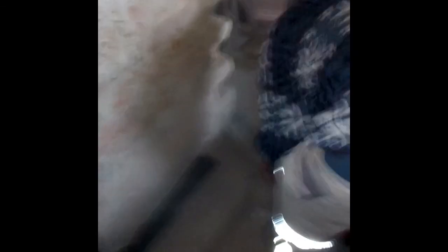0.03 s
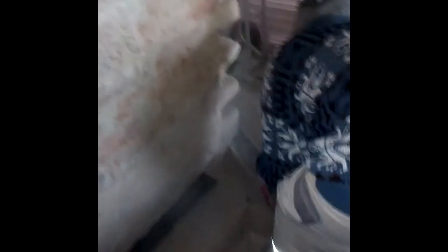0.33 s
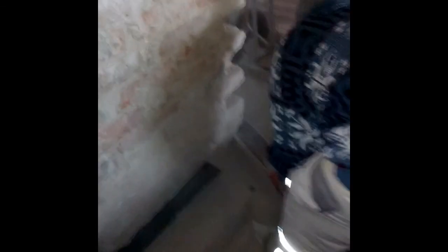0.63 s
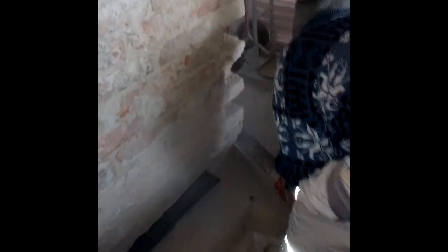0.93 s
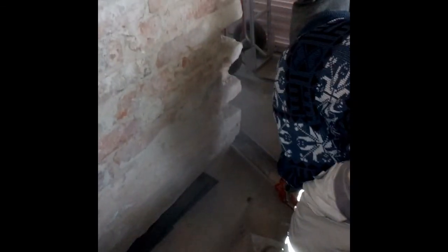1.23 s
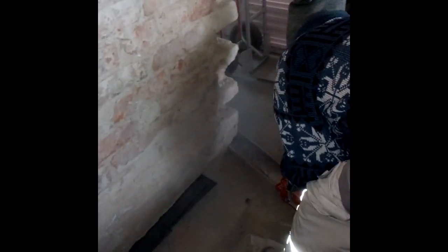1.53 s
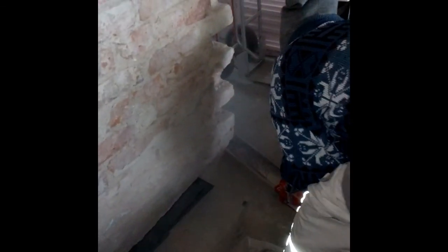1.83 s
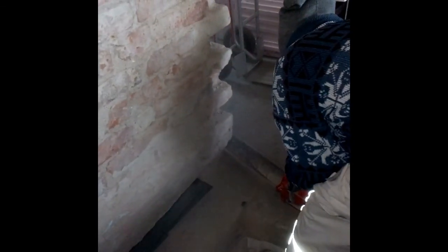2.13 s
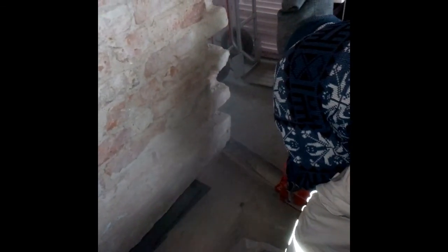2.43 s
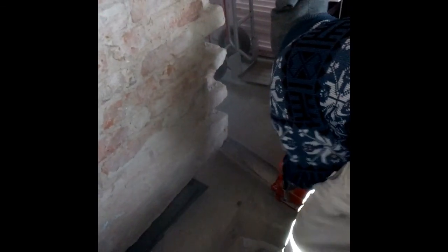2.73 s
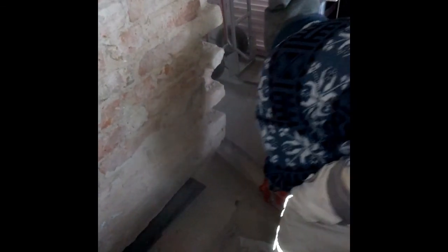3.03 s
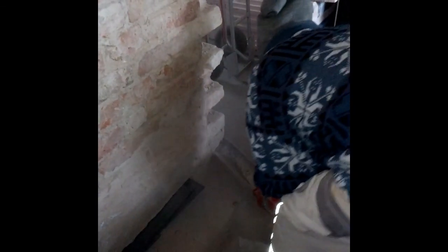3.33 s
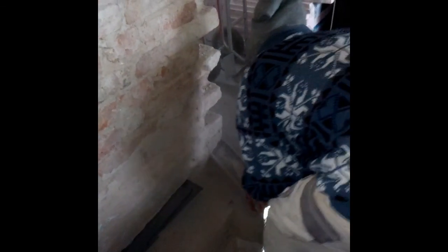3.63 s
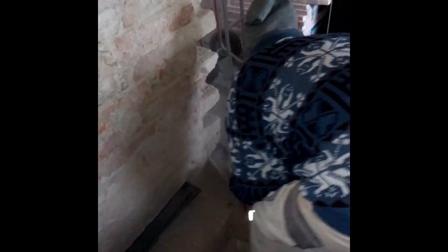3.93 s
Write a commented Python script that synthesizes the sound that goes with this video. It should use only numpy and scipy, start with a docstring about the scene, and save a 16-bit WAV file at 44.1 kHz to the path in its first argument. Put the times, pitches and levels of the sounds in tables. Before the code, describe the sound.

A power saw roars steadily against a brick wall near the microphone, grit scraping and ringing on the blade over a humming, thinly whining motor. Halfway through, the pitch drops a little while the roar carries on.

```python
"""A hand-held masonry saw runs flat out at a brick wall. From the start its motor hums, its fan whines thinly
and the geared-down blade drones below, while rushing air and grit on the blade make a loud roar that rings in
the blade and housing, with low ringing tones near 1 kHz. Around 1.5 s the motor peaks and a fine hiss has crept
in. From 2 s the pitch sags a little under load; towards 4 s the hiss fades while the roar carries on."""
import sys
import numpy as np
from scipy import signal
from scipy.fft import rfft, irfft
from scipy.io import wavfile
from scipy.ndimage import uniform_filter1d, minimum_filter1d

SR = 44100
rng = np.random.default_rng(int(sys.argv[2]) if len(sys.argv) > 2 else 0)


def output_pcm(signal):
    """Save a mono or channel-first signal as 16-bit PCM at the path in sys.argv[1].

    Samples are clipped to [-1, 1] before scaling.
    """
    pcm = np.clip(np.atleast_2d(signal).T, -1, 1) * 32767
    wavfile.write(sys.argv[1], SR, np.round(pcm).astype(np.int16))


N = 176400  # 4 s


def from_db(db):
    """Decibels to gain."""
    return 10 ** (np.asarray(db) / 20)


def unit_power(x):
    """Scale to an RMS of 1."""
    return x / np.sqrt(np.mean(x ** 2) + 1e-20)


def envelope(points):
    """Straight ramps between breakpoints, at every sample."""
    return np.interp(np.arange(N) / SR, *np.transpose(points))


def drift(rate_hz):
    """Random modulator of spread 1, moving mostly slower than rate_hz."""
    hz = np.arange(N // 2 + 1) * SR / N
    return unit_power(irfft(rfft(rng.standard_normal(N)) / (1 + (hz / rate_hz) ** 2), N))


def equalise(x, curve):
    """Shape a sound with a smooth EQ curve; unit power."""
    hz, db = np.transpose(curve)
    bins = np.maximum(np.arange(N // 2 + 1) * SR / N, 1)
    gain = from_db(np.interp(np.log(bins), np.log(hz), db))
    return unit_power(irfft(rfft(x) * gain, N))


def resonate(x, hz, width_hz):
    """A steep-sided resonance from two band-passes in series; unit power."""
    r = np.exp(-np.pi * width_hz * np.sqrt(2) / SR)
    section = [1 - r, 0, r - 1, 1, -2 * r * np.cos(2 * np.pi * hz / SR), r * r]
    return unit_power(signal.sosfilt([section, section], x))


def grit(ticks_per_s=6000, spread_db=2.5, tick_share=.39, patchy_db=.5):
    """Dense ticks of grit mixed into turbulent air."""
    sizes = from_db(spread_db * np.minimum(rng.exponential(1, N), 4)) * rng.choice([-1, 1], N)
    ticks = unit_power(sizes * (rng.random(N) < ticks_per_s / SR))
    air = rng.standard_normal(N)
    return (np.sqrt(tick_share) * ticks + np.sqrt(1 - tick_share) * air) * from_db(patchy_db * drift(22))


def ringing(modes):
    """Grit and air keep a set of resonances sounding."""
    return sum(from_db(db) * resonate(grit(), hz, width) for hz, width, db in modes)


def tone(cycles, db, flutter_db=1.3):
    """One fluttering sine locked to a shaft."""
    return np.sqrt(2) * from_db(db + flutter_db * drift(10)) * np.sin(2 * np.pi * (cycles + rng.random()))


# Fader ride of the blade's drone: t/s, level/dB
DRONE_FADER = [(0, -44), (.15, -39), (.32, -35), (.48, -55), (.75, -39), (1.05, -34.5), (1.75, -35),
               (1.95, -41.5), (2.25, -41.5), (2.45, -33.5), (2.68, -40), (2.9, -36), (3.2, -35.5),
               (4, -35.5)]
def blade_drone(blade_turns):
    """The blade drones low, at two cycles a turn."""
    return tone(2 * blade_turns, envelope(DRONE_FADER))


# Fader rides of the motor hum, the fan whine and their octaves: t/s, level/dB
HUM_FADER = [(0, -34.5), (.2, -35), (1.0, -33), (1.7, -31.5), (1.95, -36.5), (2.3, -30), (3.05, -29),
             (3.45, -31), (3.65, -33), (4, -35.5)]
HUM_OCTAVE_FADER = [(0, -27), (.42, -28.5), (.6, -34), (1.0, -34.5), (1.6, -38), (2.5, -32.5), (3.0, -36),
                    (3.5, -29.5), (3.8, -28), (4, -30)]
WHINE_FADER = [(0, -17.5), (.1, -17), (.36, -25), (.68, -17), (1.05, -26.5), (1.4, -34), (1.56, -27.5),
               (1.8, -23), (2.0, -22), (2.3, -24), (2.5, -26), (2.78, -23.5), (3.05, -21.5), (3.28, -31),
               (3.55, -19), (3.8, -23), (4, -31)]
WHINE_OCTAVE_FADER = [(0, -38), (.9, -36), (1.3, -38), (1.8, -37), (2.0, -31), (2.75, -32), (3.0, -38),
                      (3.3, -34), (3.6, -37), (4, -39)]
# Weaker motor partials: multiple of the shaft rate, level/dB
MOTOR_PARTIALS = [(3, -38), (5, -39), (7, -41), (9, -32.5), (18, -59)]
def motor(turns, fan_blades=6, whine_flutter_db=1.5):
    """The motor hums at the shaft rate; its fan whines at the rate the fan blades pass."""
    hum = tone(turns, envelope(HUM_FADER)) + tone(2 * turns, envelope(HUM_OCTAVE_FADER))
    passes = fan_blades * turns
    whine = tone(passes, envelope(WHINE_FADER)) + tone(2 * passes, envelope(WHINE_OCTAVE_FADER))
    overtones = sum(tone(k * turns, db, flutter_db=3) for k, db in MOTOR_PARTIALS)
    return hum + from_db(whine_flutter_db * drift(45)) * whine + overtones


# EQ of the dust's sizzle: f/Hz, relative level/dB
SIZZLE_EQ = [(9000, -50), (13900, -24), (14300, -4), (14750, 0), (15500, 0), (16000, -7)]
def dust_sizzle(start_db=-38, rise_db_per_s=.4, flicker_db=.9):
    """Dust sizzles at the very top, creeping up in level."""
    level_db = start_db + rise_db_per_s * np.arange(N) / SR + flicker_db * drift(25)
    return from_db(level_db) * equalise(grit(), SIZZLE_EQ)


# Fader ride of the scrape's fine hiss: t/s, level/dB
HISS_FADER = [(0, -52), (.8, -52), (1.35, -40), (2.0, -39), (2.5, -40), (2.9, -40), (3.4, -45), (4, -52)]
# EQ of that hiss: f/Hz, relative level/dB
HISS_EQ = [(4000, -40), (6500, -6), (7200, 4), (7650, -2), (8100, -15), (10000, -24), (16000, -40)]
def fine_hiss():
    """A thin band of grit noise near 7 kHz swells and fades above the scrape."""
    return from_db(envelope(HISS_FADER)) * equalise(grit(), HISS_EQ)


# Fader rides of the low ringing tones, the housing and the blade: t/s, level/dB
LOW_RING_FADER = [(0, -29), (.25, -25.5), (.7, -25), (.9, -29), (1.04, -23), (1.35, -24.5), (1.75, -22),
                  (2.12, -30.5), (2.35, -25), (2.68, -32), (2.87, -19.5), (3.2, -22.5), (3.43, -23.5),
                  (3.7, -23), (3.86, -19), (4, -24.5)]
HOUSING_FADER = [(0, -24), (.2, -18), (.42, -20.5), (.57, -16.5), (.9, -23), (1.16, -14), (1.3, -22),
                 (1.42, -15.5), (1.57, -17.5), (1.74, -15), (2.1, -17.5), (2.3, -15), (2.6, -16),
                 (2.85, -17), (2.98, -16.5), (3.5, -18), (3.9, -17), (4, -18)]
BLADE_FADER = [(0, -25), (.6, -15.5), (1.25, -21), (1.6, -15), (1.95, -12), (2.25, -14.5), (2.42, -13),
               (2.6, -16), (3.0, -14.5), (3.4, -23), (4, -14)]
# Resonances of the same layers: f/Hz, width/Hz, relative level/dB
LOW_RING = [(959.8, 31.4, -6), (1011, 31, -10), (1224, 53, -12), (885, 17, -21)]
HOUSING_RING = [(2242, 41, -9), (2323, 68, -8), (2392, 55, -21)]
BLADE_RING = [(4276, 103, -9.5), (4106, 85, -15.5)]
def ringing_parts(burst_db=1.5, burst_hz=22):
    """Air and grit ring the saw in bursts: low tones near 1 kHz, housing in the middle, blade high."""
    parts = [(LOW_RING_FADER, LOW_RING), (HOUSING_FADER, HOUSING_RING), (BLADE_FADER, BLADE_RING)]
    return sum(from_db(envelope(fader) + burst_db * drift(burst_hz)) * ringing(modes)
               for fader, modes in parts)


# Fader ride of the scrape: t/s, level/dB
SCRAPE_FADER = [(0, -18), (.3, -17.3), (.43, -18), (.65, -16.5), (.88, -19.5), (1.04, -16), (1.25, -18),
                (1.6, -17), (1.85, -15.5), (2.12, -18), (2.43, -17.5), (2.62, -19.5), (2.8, -17),
                (3.0, -18), (3.3, -18), (3.5, -18.5), (3.7, -19), (4, -18.5)]
# EQ of the scrape: f/Hz, relative level/dB
SCRAPE_EQ = [(1500, -33), (3200, -7.5), (3550, -3.5), (3950, 2.5), (4300, 2), (4550, -1), (4800, 2),
             (5100, 1.5), (5280, -3), (5600, -2), (6300, -4.5), (6800, -10.5), (7400, -21), (8000, -29),
             (9400, -29.5), (10500, -33), (13800, -32), (16000, -33)]
# Resonances of the scrape: f/Hz, width/Hz, relative level/dB
SCRAPE_RING = [(4796, 87, -15), (5057, 130, -15.5), (6010, 70, -25)]
def scrape(trim_db=-1.06):
    """Grit scrapes on the blade: the roar's bright edge, around 4-6 kHz."""
    noise = from_db(trim_db) * equalise(grit(), SCRAPE_EQ)
    return from_db(envelope(SCRAPE_FADER)) * (noise + ringing(SCRAPE_RING))


# Fader ride of the rush: t/s, level/dB
RUSH_FADER = [(0, -17.5), (.2, -18), (.42, -17.5), (.6, -18), (.9, -19), (1.08, -18), (1.3, -19.5),
              (1.42, -17), (1.6, -18), (1.85, -17.5), (2.1, -19), (2.3, -17.5), (2.6, -18.5), (2.88, -17.5),
              (3.15, -17.5), (3.3, -18), (3.45, -18), (4, -17.5)]
# EQ of the rush: f/Hz, relative level/dB
RUSH_EQ = [(20, -25), (70, -39.5), (130, -27.5), (240, -19.5), (380, -13), (460, -17.5), (560, -9),
           (680, -9.5), (820, -4.5), (1200, -4), (1450, -3.5), (1800, -5), (1970, 1), (2600, -0.5),
           (3000, -2.5), (3300, -0.5), (3550, -16), (5000, -19), (16000, -57)]
# Resonances of the rush: f/Hz, width/Hz, relative level/dB
RUSH_RING = [(801, 24, -22.5), (1588, 60, -16), (1780, 25, -23.5), (1964, 63, -15.5), (2806, 120, -19),
             (3160, 58, -19)]
def rush(trim_db=-.5):
    """Air and grit rush over the blade: the roar's midrange body."""
    noise = from_db(trim_db) * equalise(grit(), RUSH_EQ)
    return from_db(envelope(RUSH_FADER)) * (noise + ringing(RUSH_RING))


# Brief ducks in the roar: t/s, depth/dB
ROAR_DIPS = [(.345, 1), (1.5, 3), (1.71, 2), (1.87, 2.5), (1.965, 3.5), (2.495, 0.5), (2.84, 4),
             (2.925, 2.5), (3.265, 3)]
def blade_roar(blade_turns, dip_width_s=.0096, chatter_db=.49, rub_depth=.032):
    """All the air and grit layers dip and chatter together, pulsing lightly once a blade turn."""
    layers = rush() + scrape() + ringing_parts() + fine_hiss() + dust_sizzle()
    t = np.arange(N) / SR
    dip_db = sum(depth * np.exp(-.5 * ((t - at) / dip_width_s) ** 2) for at, depth in ROAR_DIPS)
    chatter = from_db(chatter_db * drift(45))
    rub = 1 + rub_depth * np.sin(2 * np.pi * blade_turns)
    return from_db(-dip_db) * chatter * rub * layers


# Pitch curve of the motor shaft: t/s, f/Hz
SHAFT_RATE = [(0, 560.4), (.18, 560.3), (.35, 561.7), (.7, 560.7), (1.15, 560.8), (1.4, 563), (1.56, 565.2),
              (1.92, 563.6), (2.06, 559.2), (2.25, 559), (2.4, 555.5), (2.6, 557), (2.78, 560.8),
              (2.87, 555.5), (3.05, 556.5), (3.35, 554.7), (3.88, 558), (4, 556.5)]
def scene(gear_ratio=4.07, wobble=.00079):
    """The motor drives the blade through a bevel gear; mono."""
    shaft_hz = envelope(SHAFT_RATE) * (1 + wobble * drift(13.7))
    turns = np.cumsum(shaft_hz) / SR
    blade_turns = turns / gear_ratio
    return (motor(turns) + blade_drone(blade_turns) + blade_roar(blade_turns))[None]


def record(dry, ceiling=.85, cutoff_hz=15550):
    """A fast limiter holds the highest peaks; the top is cut steeply."""
    gain = np.minimum(1, ceiling / (np.abs(dry) + 1e-9))
    gain = uniform_filter1d(minimum_filter1d(gain, size=129), size=129)  # hold and smooth over 3 ms
    high_cut = signal.ellip(12, .1, 80, cutoff_hz, fs=SR, output="sos")
    return signal.sosfilt(high_cut, dry * gain)


dry = scene()
out = record(dry)
output_pcm(out)
```